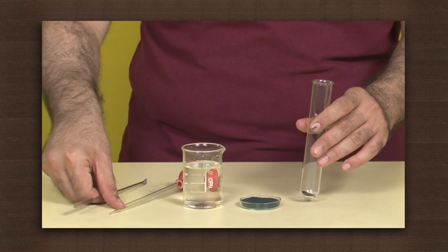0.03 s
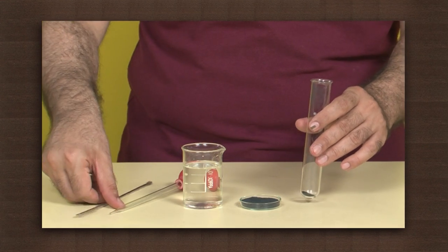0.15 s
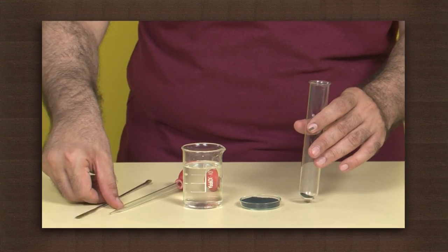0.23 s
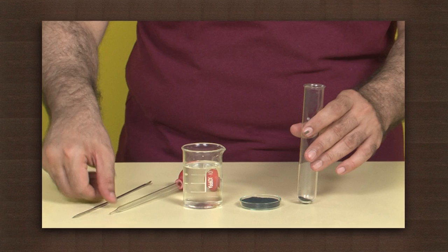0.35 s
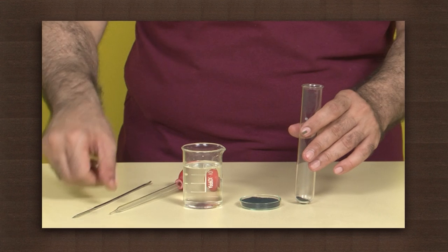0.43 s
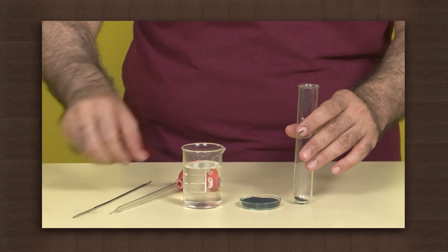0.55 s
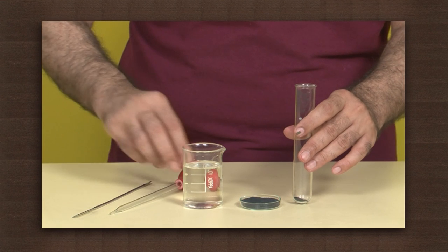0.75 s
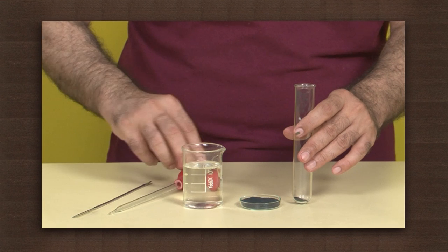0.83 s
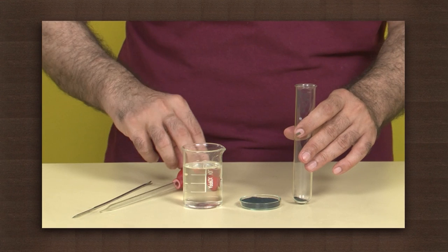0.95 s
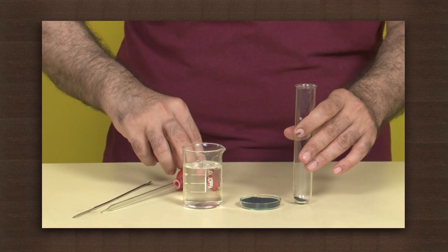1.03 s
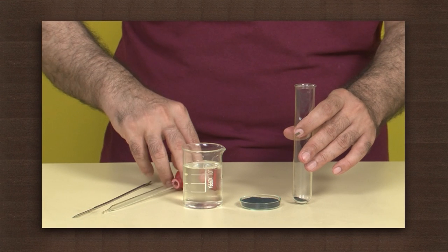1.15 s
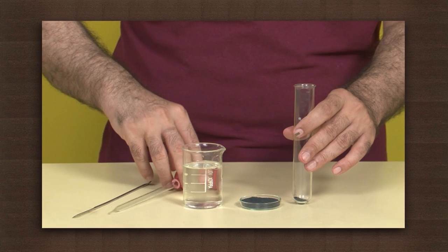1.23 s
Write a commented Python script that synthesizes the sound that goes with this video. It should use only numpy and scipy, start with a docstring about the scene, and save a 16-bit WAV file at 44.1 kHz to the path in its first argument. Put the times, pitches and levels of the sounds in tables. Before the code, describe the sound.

Thin metal tool drops and rattles on a tabletop, then a small object knocks.

```python
"""A table in a small room, one close microphone. A thin metal spatula ticks in the fingers as it is lifted,
then drops and chatters to rest, each bounce ringing the metal and the table top. The hand comes down
with a dull thump and stops the ring. The fingers tap, then knock a small object beside a glass beaker,
and at the very end it starts to slide. A low ventilation hum runs underneath throughout."""
import sys
import numpy as np
from scipy import signal
from scipy.fft import rfft, irfft, next_fast_len
from scipy.io import wavfile

SR = 44100
rng = np.random.default_rng(int(sys.argv[2]) if len(sys.argv) > 2 else 0)


def wav_out(sig):
    """Save sig, one row per channel (or a flat mono array), as 16-bit PCM at SR to the path in sys.argv[1]."""
    wavfile.write(sys.argv[1], SR, np.round(np.clip(np.atleast_2d(sig).T, -1, 1) * 32767).astype(np.int16))


N = 57330
T = np.arange(N) / SR
AGE = np.arange(18000) / SR  # time since a contact [s]

# tone of metal hitting the table (frequency [Hz], level [dB])
BOUNCE_COLOUR = [(25, -46), (45, -10.5), (70, -2.5), (130, 6), (330, -4), (650, 3), (950, 4), (1700, 4.5),
                 (2700, 2), (4500, -4.5), (6800, -8.5), (8300, -15.5), (12000, -24.5), (14500, -26),
                 (16000, -39)]
# decay of table and room after a bounce (frequency [Hz], t60 [s])
BOUNCE_T60 = [(100, 0.17), (300, 0.56), (800, 0.26), (2000, 0.14), (5000, .14), (12000, 0.073)]
# their decay after a knock (frequency [Hz], t60 [s])
KNOCK_T60 = [(100, 0.32), (220, 0.32), (400, 0.22), (1100, 0.15), (3200, .12), (9000, 0.085)]


def spatula():
    """Shrinking bounces ring the table top and the metal rod until the hand damps both."""
    # hits on the table (time [s], level [dB], crack [dB], bass [dB], treble [dB], rod ring [dB],
    # end that lands [0 tip to 1 handle], clack pitch [Hz], clack [dB])
    bounces = [(0.2304, -6.5, 1, -7.5, 8, -61, 0.88, 1540, -13),
               (.2338, -8.5, 2.5, 4.5, -15, -54.5, 0.42, 1874, -14),
               (.2505, -13.5, 5, -10, 1, -45, 0.28, 1180, -17),
               (.2742, -19.5, 6, -6.5, -2, -54, 0, 2133, -4), (.2825, -22, -3.5, 16, -5, -63, 0.14, 523, 0),
               (0.3018, -15.5, 5, -5.5, 5.5, -67, 0, 1450, -7),
               (.3040, -14.5, -11, -2.5, -3, -69, 0.13, 2647, -11),
               (.3200, -13.5, 5, 0.5, -1.5, -43.5, 1, 1770, -14),
               (0.3343, -17, 5, 2, 4, -38.5, 0.86, 1153, -12),
               (.3450, -22.5, 7.5, -13, 1, -58, 0.78, 3450, -18),
               (0.353, -25, 4, 5, 8.5, -56, 1, 2020, -18), (0.3669, -22.5, 1, 4, 4, -50, 0.86, 1380, -9.5),
               (0.3755, -27, 1.5, 8.5, 2, -62, 0.82, 1122, -8),
               (.3875, -28, -4, 12, 8.5, -68, 0.82, 2000, -6.5),
               (.4040, -24, 0, 4.5, -23, -59, 1, 2245, -14.5)]
    # bending modes (frequency [Hz], t60 [s], level if the tip lands [dB], if the handle lands [dB])
    rod_modes = [(3180, 0.31, -27, -9.5), (3770, 0.085, 0, -44.5), (5150, 0.25, 3, -19),
                 (7192, 0.27, -3.5, -3.5), (8802, 0.26, -27.5, -21.5), (9071, 0.3, -14.5, -24),
                 (11650, 0.25, -8.5, -21), (13383, 0.17, -33.5, -14.5)]
    tip = ring([(hz, t60, db) for hz, t60, db, _ in rod_modes])
    handle = ring([(hz, t60, db) for hz, t60, _, db in rod_modes])
    table = table_ring()
    clack_t60_s, flutter_db = 0.036, 3.9
    hits, rod, top = np.zeros((3, N))
    for s, db, crack_db, bass_db, treble_db, ring_db, end, clack_hz, clack_db in bounces:
        hit = blow(BOUNCE_T60, crack_db, scatter_db=-19.5, early_db=5)
        # pressed on the table, the rod rings briefly at a pitch set by the point of contact
        clack = ring([(clack_hz, clack_t60_s, clack_db)]) * (1 - np.exp(-AGE * clack_hz))
        hits += amp(db) * late(colour(hit, BOUNCE_COLOUR, bass_db, treble_db) + clack, s)
        top += amp(db) * late(table, s)
        rod += amp(ring_db) * late((1 - end) * tip + end * handle, s)
    rod *= amp(flutter_db * band_noise(0, 90))  # the ring flutters as the rod grazes the table
    return hits + hand_damping(rod, t60=0.088) + hand_damping(top, t60=0.12)


def finger_ticks():
    """The spatula ticks lightly in the fingers, with a little of the table's ring."""
    # light contacts (time [s], level [dB], crack [dB])
    ticks = [(0.0952, -29, 6.5), (0.1362, -30, 5.5), (0.1504, -34.5, 6.5), (0.188, -34.5, 5.5),
             (.1955, -35, 5.5), (0.2032, -35, 3.5)]
    # their tone (frequency [Hz], level [dB])
    tick_colour = [(40, -13.5), (150, 4), (400, -10), (720, 7), (1000, -3), (1500, 3.5), (2100, 4),
                   (2900, 3), (4000, -6), (6500, -12.5), (9000, -22.5), (13000, -28.5), (15000, -43.5)]
    out, table = np.zeros(N), amp(-4.5) * table_ring()
    for s, db, crack_db in ticks:
        tick = colour(blow(BOUNCE_T60, crack_db, scatter_db=-20, early_db=2.5), tick_colour)
        out += amp(db) * late(tick + table, s)
    return out


def table_ring():
    """The struck table top rings a little longer than its reflections."""
    # its modes (frequency [Hz], level [dB])
    top_modes = [(510, -33), (575, -35), (667, -24.5), (712, -24), (820, -51), (893, -44), (1120, -26),
                 (1188, -34), (1424, -37), (1605, -31.5), (1755, -31), (2148, -35.5), (2620, -33),
                 (2685, -30.5)]
    return ring([(hz, 1.1 * along(BOUNCE_T60, hz), db) for hz, db in top_modes])


def table_flex():
    """The table top flexes under the falling spatula in low, soft swings."""
    # pushes (time [s], level [dB])
    flexes = [(0.282, -42), (.32, -40.5)]
    # slow modes (frequency [Hz], t60 [s], level [dB])
    flex_modes = [(59.4, .3, -5), (123.4, .4, 5), (206.2, 0.39, -1.5)]
    swing = ring(flex_modes) * (1 - np.exp(-AGE / 0.012))
    return sum(amp(db) * late(swing, s) for s, db in flexes)


def hand_thumps():
    """The hand thumps dully through the table, each time with a dry click of the spatula."""
    # landings (time [s], thump [dB], click [dB])
    thumps = [(0.4305, -17.5, -25.5), (0.4367, -24, -37)]
    # their tone (frequency [Hz], level [dB])
    thump_colour = [(40, -11.5), (80, -8), (130, -3), (200, 3.5), (300, 2), (450, 0.5), (740, 2),
                    (1000, -12), (2000, -18.5), (6000, -40), (16000, -61)]
    # their decay (frequency [Hz], t60 [s])
    thump_t60 = [(100, 0.33), (230, 0.46), (380, 0.2), (700, 0.16), (3000, 0.13)]
    # table modes that only a soft, heavy push wakes (frequency [Hz], t60 [s], level [dB])
    deep_modes = [(118.4, .4, -26.5), (142.8, 0.25, -19.5), (210, 0.75, -39), (299.5, 0.33, -21.5),
                  (463, 0.32, -27.5), (601.4, 0.16, -16.5), (715, 0.073, -13.5)]
    out, deep = np.zeros(N), ring(deep_modes)
    for s, db, click_db in thumps:
        click = colour(blow(KNOCK_T60, 0, scatter_db=-33, early_db=-1.5), BOUNCE_COLOUR, treble_db=16.5)
        thud = colour(blow(thump_t60, 5.5, scatter_db=-16, early_db=8), thump_colour)
        out += late(amp(db) * (thud + deep) + amp(click_db) * click, s)
    return out


def hand_damping(x, t60, rest_s=0.437):
    """The resting hand adds its own decay to a ring."""
    return x * decay(np.maximum(T - rest_s, 0), t60)


def object_knocks():
    """A tap, then a harder knock: each snaps and rings the small object."""
    # contacts (time [s], level [dB], crack [dB], bass [dB], treble [dB], ring [dB])
    knocks = [(0.8615, -25.5, 3, -5, -13.5, 1.5), (1.0403, -13, -1, -3, 3, -0.5)]
    # their tone (frequency [Hz], level [dB])
    knock_colour = [(25, -30), (60, -8), (150, 2), (350, -6), (750, -0.5), (1300, -3), (2200, -7),
                    (3700, 3), (5500, -10), (8500, -14.5), (13000, -24), (14500, -38), (16000, -40)]
    # hard, dry snap of first contact (frequency [Hz], level [dB])
    snap_colour = [(500, -32), (2500, 4), (4200, 1), (8000, 2.5), (13000, -11), (16000, -36)]
    # the object's modes on the table (frequency [Hz], t60 [s], level [dB])
    object_modes = [(515, 0.27, -34.5), (693, 0.13, -38), (704, 0.18, -27), (807.5, 0.18, -27.5),
                    (885, 0.18, -32), (1123, 0.1, -27.5), (1755, 0.13, -31), (2540, 0.049, -21),
                    (2800, 0.18, -33), (3330, 0.18, -37.5), (3314, 0.033, -16.5), (3765, 0.039, -37)]
    out, body = np.zeros(N), ring(object_modes)
    for s, db, crack_db, bass_db, treble_db, ring_db in knocks:
        hit = blow(KNOCK_T60, crack_db, scatter_db=-18, early_db=2.5)
        knock = colour(hit, knock_colour, bass_db, treble_db)
        snap = amp(0.5) * colour(crack(early_db=-24), snap_colour, treble_db=treble_db)
        out += amp(db) * late(knock + snap + amp(ring_db) * body, s)
    return out


def object_slide(start_s=1.2697, rise_s=0.028):
    """Friction swells in the object's resonances as it starts to slide."""
    # rubbed resonances (frequency [Hz], width [Hz], level [dB])
    resonances = [(809, 29, 3), (1500, 690, -4), (2600, 180, -3.5), (3430, 930, -6)]
    rub = sum(amp(db) * band_noise(hz, width) for hz, width, db in resonances)
    return amp(-56.5) * rub * np.clip((T - start_s) / rise_s, 0, 1)


def opening_ring():
    """A faint ring is dying away as the scene opens."""
    # its modes (frequency [Hz], t60 [s], level [dB])
    faint_modes = [(805, 0.085, -53), (1430, 0.33, -66.5)]
    return late(ring(faint_modes), 0)


def room_tone(hum_hz=96.1, drift_hz=2.5):
    """The ventilation hum wavers in pitch and level over soft rumble and hiss."""
    # course of the hum (time [s], level [dB])
    hum_levels = [(0.0, -60), (0.072, -49.5), (0.17, -65), (0.228, -55), (0.264, -52), (0.314, -50.5),
                  (0.48, -58.5), (1.024, -53.5), (1.086, -64), (1.194, -45.5), (1.23, -68), (1.3, -50.5)]
    # tone of the rumble and hiss (frequency [Hz], level [dB])
    room_colour = [(20, -30.5), (32, -13), (50, 3), (80, -2), (125, 1.5), (170, -5), (250, -11.5),
                   (400, -17.5), (800, -23.5), (1600, -26.5), (4000, -36.5), (9000, -42), (13200, -42),
                   (14200, -60)]
    hz = hum_hz + drift_hz * band_noise(0, 12)
    hum = np.sqrt(2) * np.sin(2 * np.pi * np.cumsum(hz) / SR)
    hum *= amp(np.interp(T, *np.array(hum_levels).T))
    return hum + amp(-56.5) * colour(rng.standard_normal(N), room_colour)


def blow(t60s, crack_db, scatter_db, early_db):
    """A contact and its reflections."""
    return amp(crack_db) * crack(early_db) + amp(scatter_db) * scatter(t60s)


def crack(early_db, splinter_s=0.0005, early_s=0.0027, low_cut_hz=549):
    """The contact, thin in the bass: a sharp pulse, a splinter of noise and the nearest reflections."""
    def burst(s):
        signs = rng.choice([-1., 1.], len(AGE))
        return signs * np.exp(-np.minimum(AGE / s, 20)) / np.sqrt(s * SR / 2)
    out = 0.58 * burst(splinter_s) + amp(early_db) * burst(early_s)
    out[0] -= 1  # the pulse
    return signal.lfilter(*signal.butter(1, low_cut_hz, "high", fs=SR), out)


def scatter(t60s, build_cycles=1.4, wall_delay_s=0.003):
    """Dense reflections of table and room; each octave builds up and dies at its own rate."""
    f = np.fft.rfftfreq(len(AGE), 1 / SR)
    centres = np.geomspace(60, 15000, 9)
    noise, out = rfft(flat_noise(len(AGE))), 0
    for hz, share in zip(centres, np.eye(len(centres))):
        band = irfft(noise * along(list(zip(centres, share)), f))
        build_up = 1 - np.exp(-AGE * hz / build_cycles)  # the bass comes late
        out += band * build_up * decay(AGE, along(t60s, hz))
    return out * (1 - np.exp(-AGE / wall_delay_s))


def ring(modes):
    """Decaying sines from (frequency [Hz], t60 [s], level [dB]); neighbours swing opposite ways."""
    return sum((-1) ** k * amp(db) * np.sin(2 * np.pi * hz * AGE) * decay(AGE, t60)
               for k, (hz, t60, db) in enumerate(modes))


def colour(x, points, bass_db=0, treble_db=0, bass_hz=800, treble_hz=4500):
    """Causal filter of unit power through (frequency [Hz], level [dB]) points, plus two shelves."""
    size = 2 * next_fast_len(len(x) // 2 + 1024, True)
    hz = np.fft.rfftfreq(size, 1 / SR)
    shelves = bass_db / (1 + (hz / bass_hz) ** 2) + treble_db * hz ** 2 / (hz ** 2 + treble_hz ** 2)
    cepstrum = irfft(np.log(unit(amp(along(points, hz))) * amp(shelves)))
    cepstrum[1:size // 2] *= 2  # fold to minimum phase
    cepstrum[size // 2 + 1:] = 0
    return irfft(rfft(x, size) * np.exp(rfft(cepstrum)))[:len(x)]


def band_noise(hz, width):
    """Noise of rms 1 in one resonance."""
    f = np.fft.rfftfreq(N, 1 / SR)
    return unit(irfft(rfft(rng.standard_normal(N)) / (1 + (2 * (f - hz) / width) ** 2), N))


def flat_noise(size):
    """Noise of rms 1 with an even spectrum."""
    return unit(irfft(np.exp(2j * np.pi * rng.random(size // 2 + 1))))


def along(points, hz):
    """Read (frequency [Hz], value) points on a log-frequency axis."""
    p = np.array(points, float)
    return np.interp(np.log(np.maximum(hz, 1)), np.log(p[:, 0]), p[:, 1])


def decay(age, t60):
    """Fall by 60 dB every t60 seconds."""
    return np.exp(-np.log(1000) * age / t60)


def late(x, s):
    """Start a sound at s seconds."""
    return np.concatenate([np.zeros(int(round(s * SR))), x, np.zeros(N)])[:N]


def amp(db):
    """Decibels to gain."""
    return 10 ** (np.asarray(db) / 20)


def unit(x):
    """Scale to rms 1."""
    return x / np.sqrt(np.mean(x ** 2))


def scene():
    """Everything sits in the centre, close to the microphone, with only a trace of width."""
    mid = finger_ticks() + spatula() + table_flex() + hand_thumps()
    mid += object_knocks() + object_slide() + opening_ring() + room_tone()
    spread = rng.standard_normal(256)
    side = amp(-38) * signal.fftconvolve(mid, spread / np.linalg.norm(spread))[:N]
    return np.array([mid + side, mid - side])


def record(dry):
    """The recorder cuts the top steeply above 15.8 kHz."""
    return signal.sosfilt(signal.ellip(8, .2, 70, 15800, fs=SR, output="sos"), dry)


dry = scene()
out = record(dry)
wav_out(out)
```